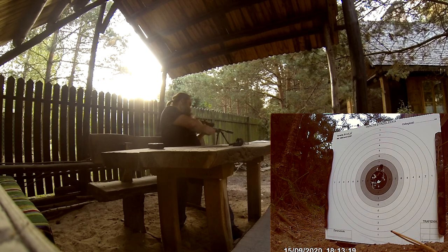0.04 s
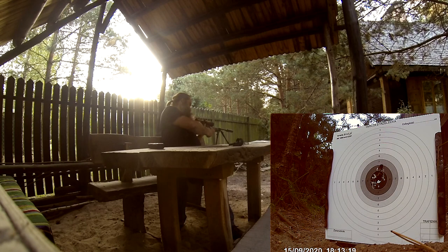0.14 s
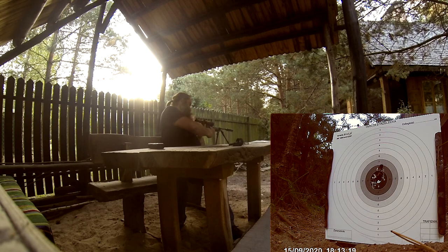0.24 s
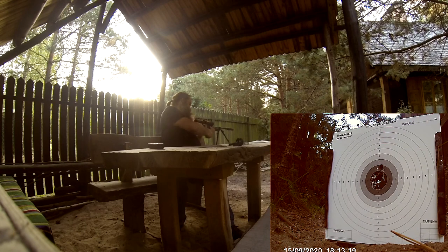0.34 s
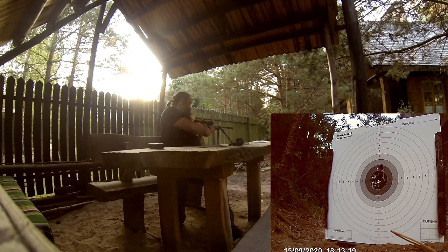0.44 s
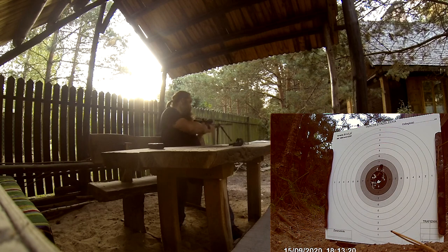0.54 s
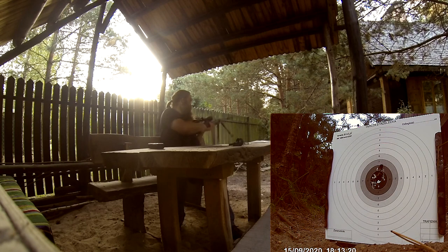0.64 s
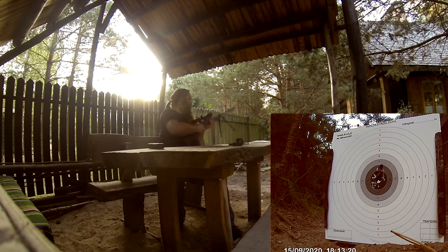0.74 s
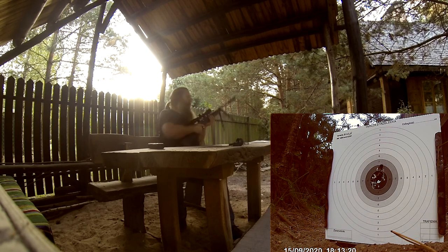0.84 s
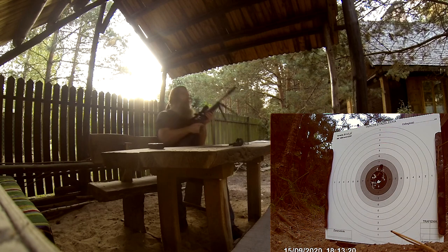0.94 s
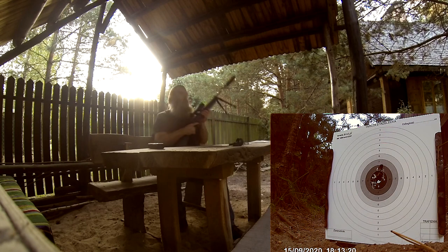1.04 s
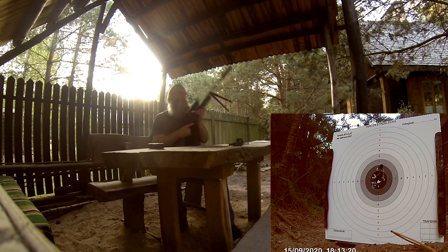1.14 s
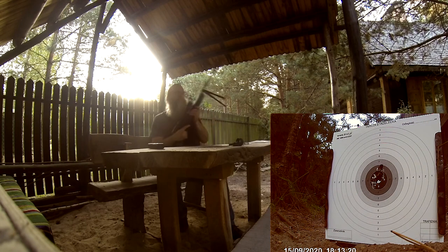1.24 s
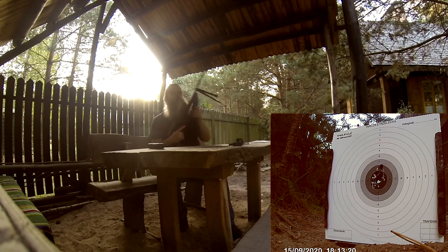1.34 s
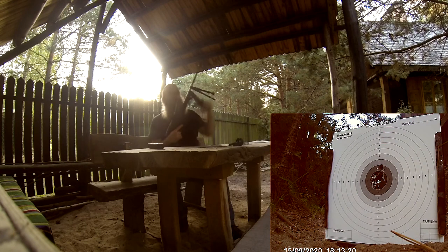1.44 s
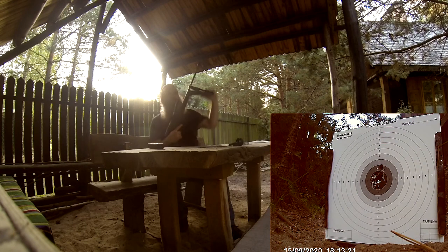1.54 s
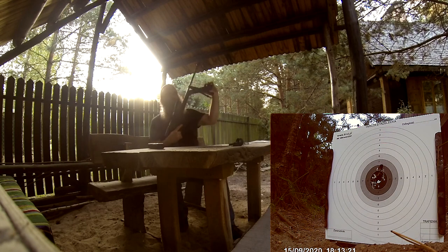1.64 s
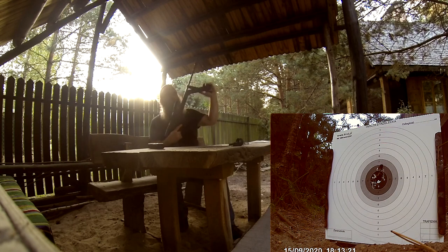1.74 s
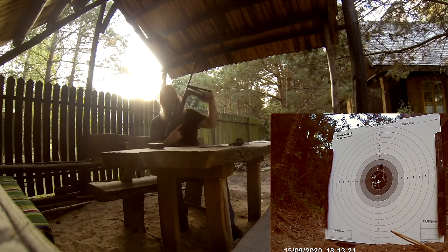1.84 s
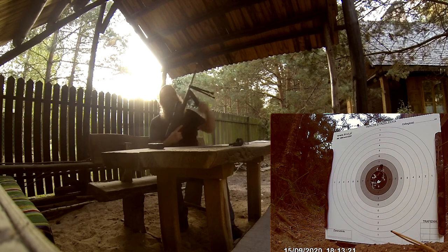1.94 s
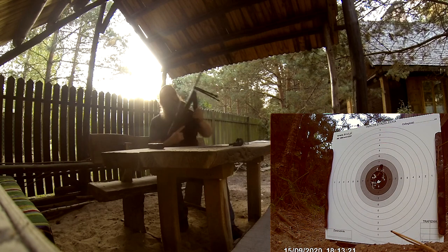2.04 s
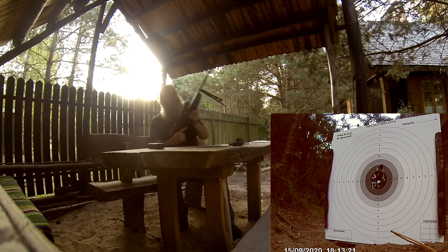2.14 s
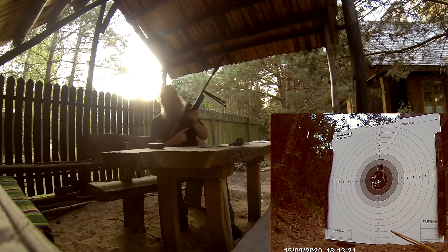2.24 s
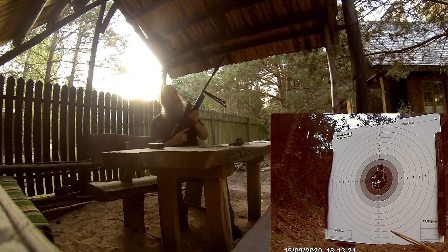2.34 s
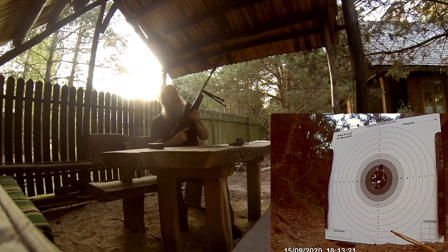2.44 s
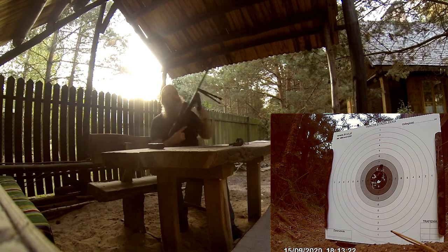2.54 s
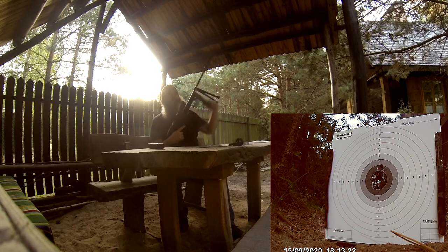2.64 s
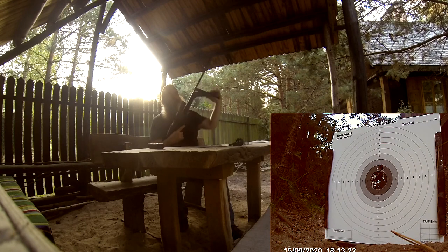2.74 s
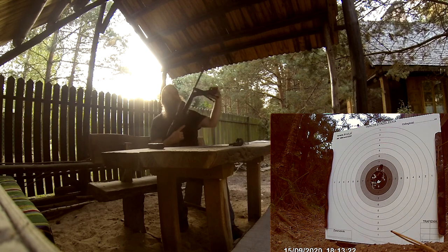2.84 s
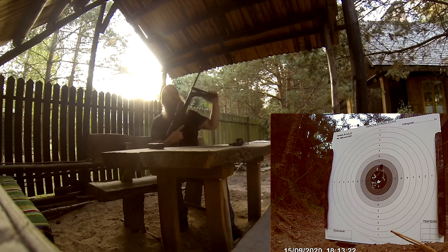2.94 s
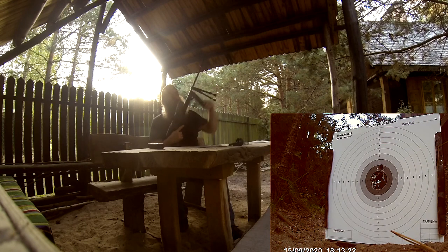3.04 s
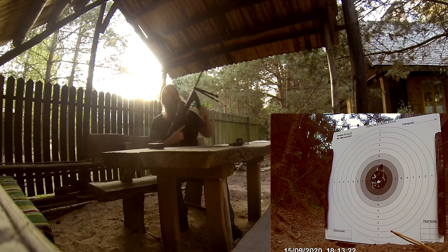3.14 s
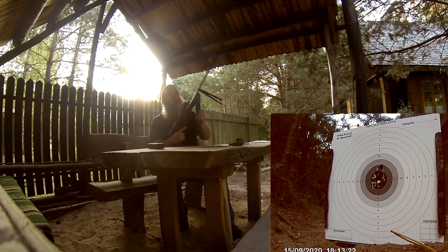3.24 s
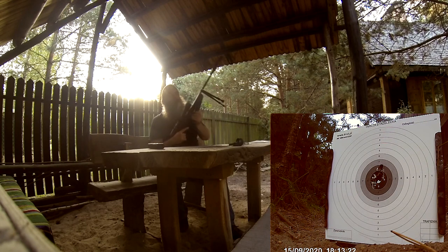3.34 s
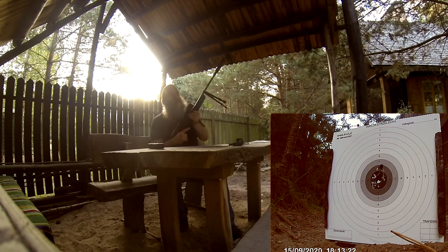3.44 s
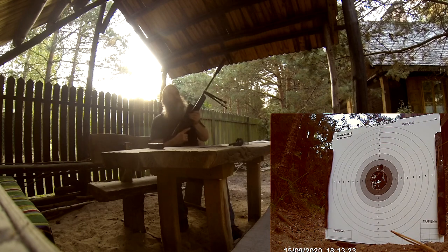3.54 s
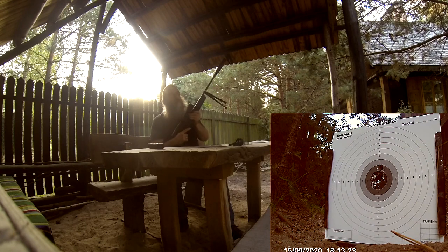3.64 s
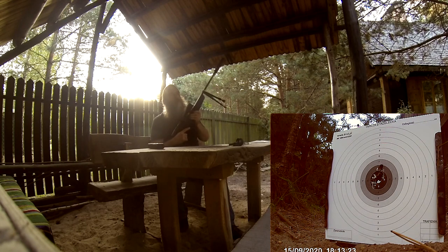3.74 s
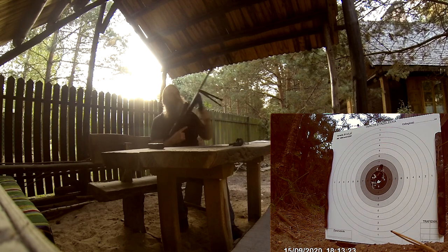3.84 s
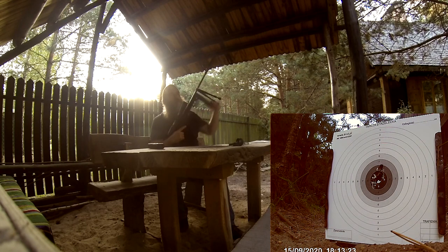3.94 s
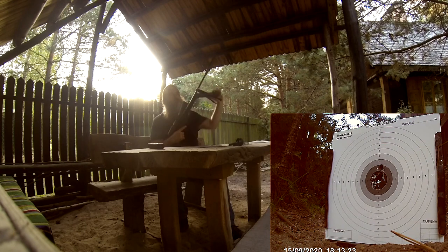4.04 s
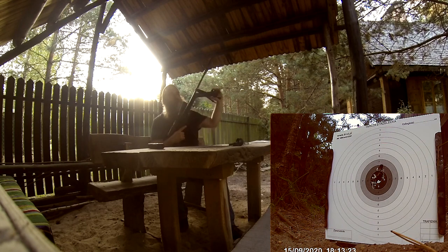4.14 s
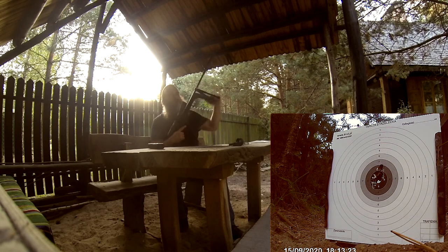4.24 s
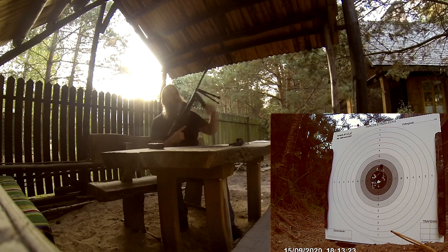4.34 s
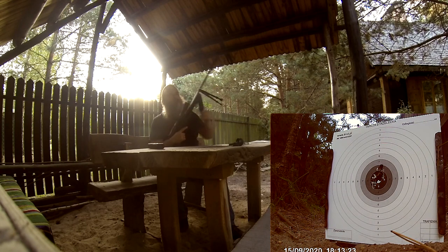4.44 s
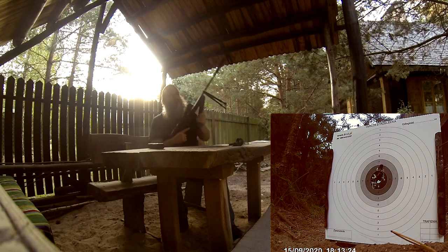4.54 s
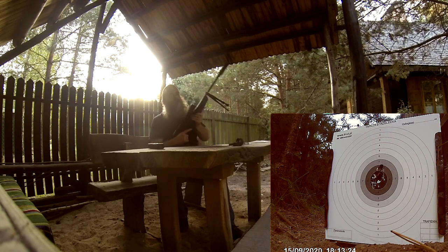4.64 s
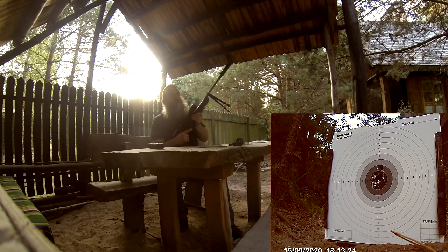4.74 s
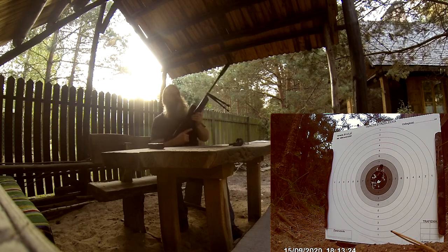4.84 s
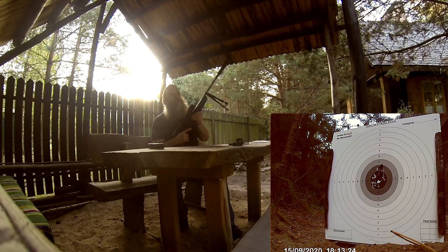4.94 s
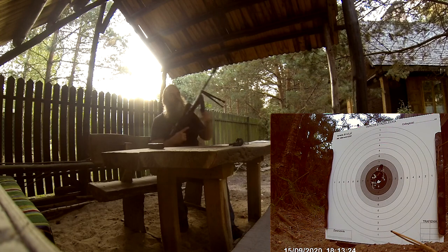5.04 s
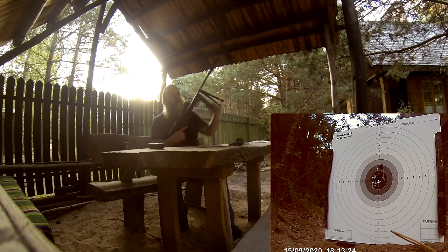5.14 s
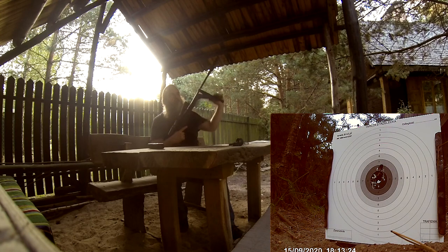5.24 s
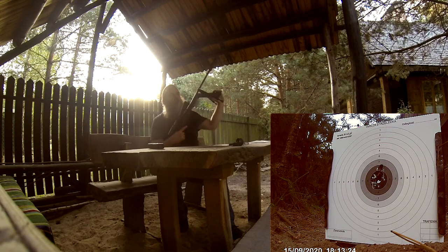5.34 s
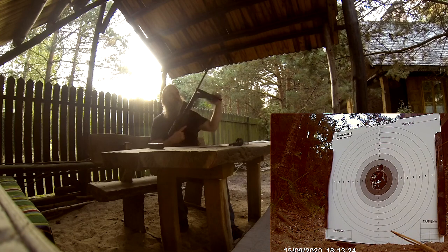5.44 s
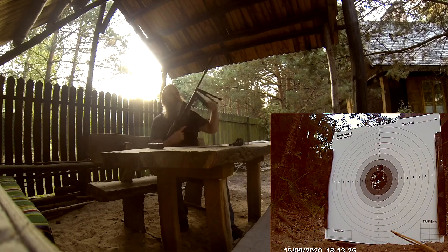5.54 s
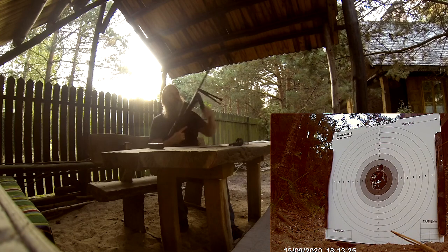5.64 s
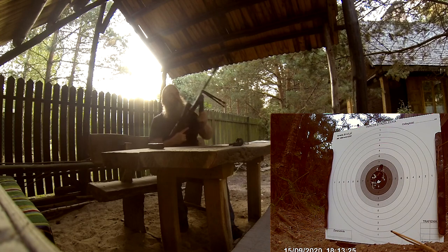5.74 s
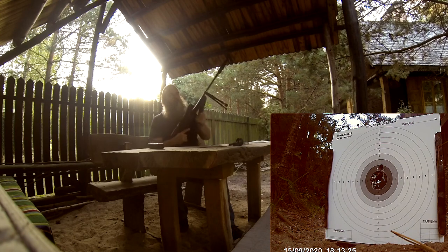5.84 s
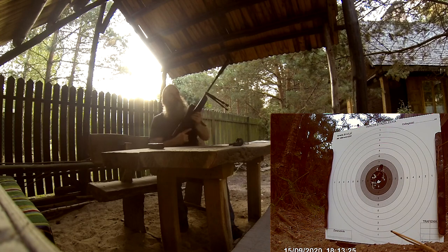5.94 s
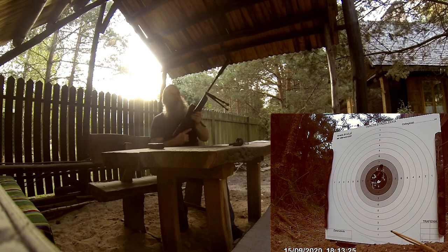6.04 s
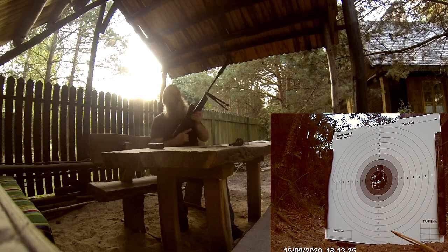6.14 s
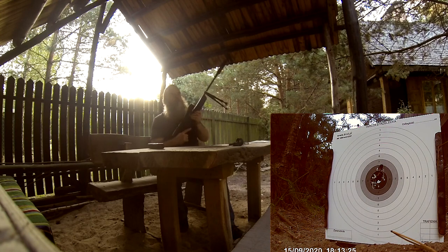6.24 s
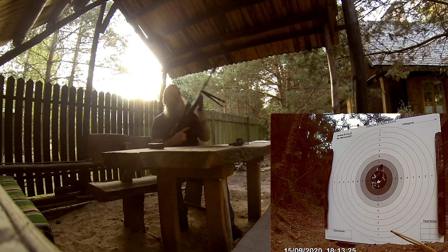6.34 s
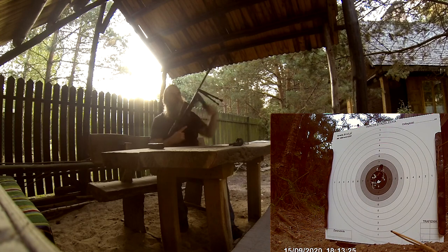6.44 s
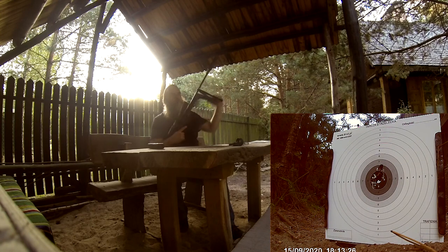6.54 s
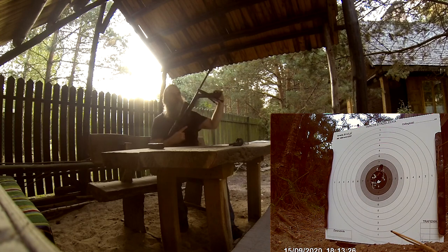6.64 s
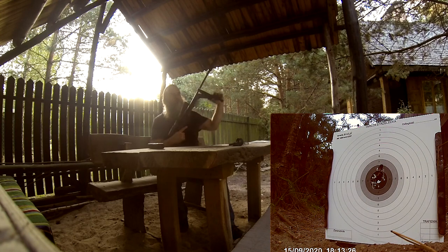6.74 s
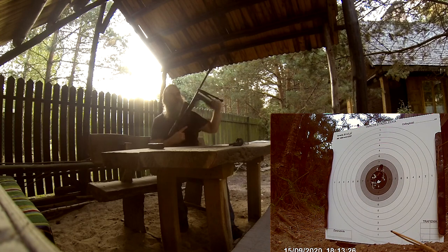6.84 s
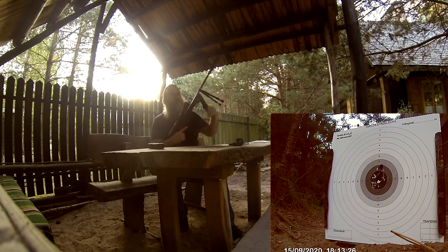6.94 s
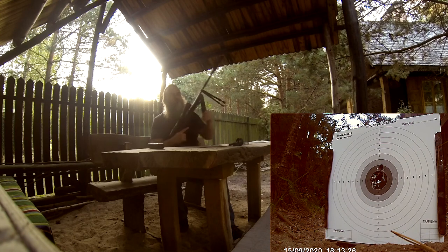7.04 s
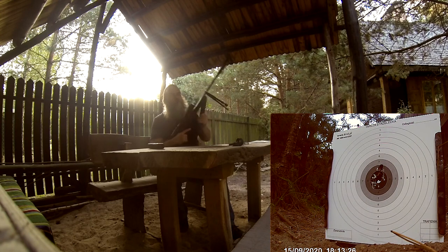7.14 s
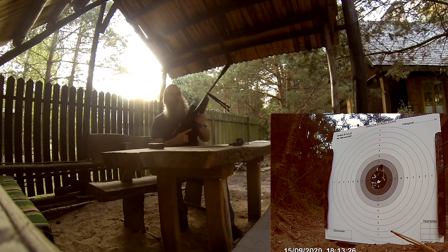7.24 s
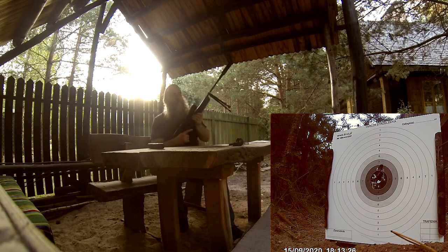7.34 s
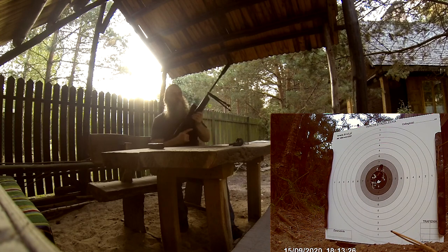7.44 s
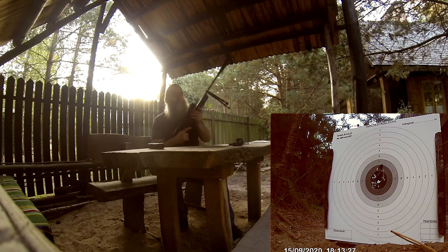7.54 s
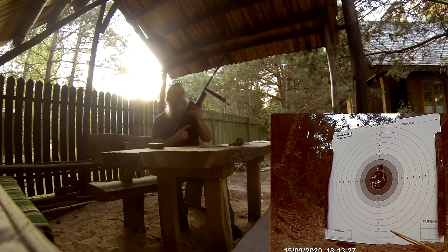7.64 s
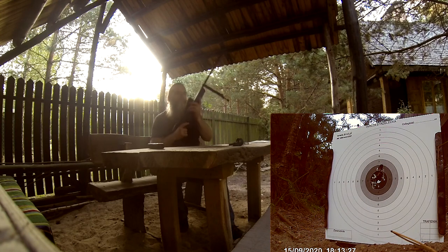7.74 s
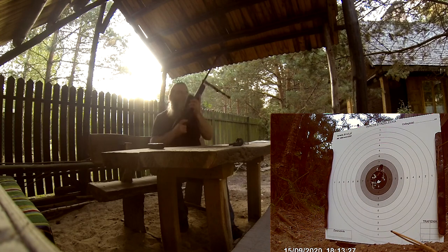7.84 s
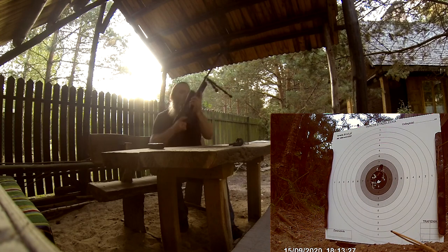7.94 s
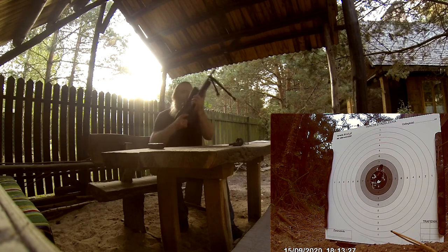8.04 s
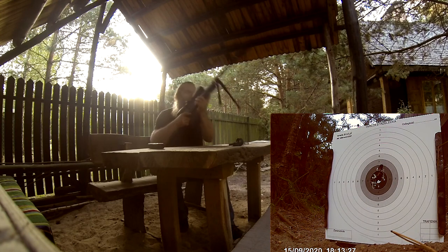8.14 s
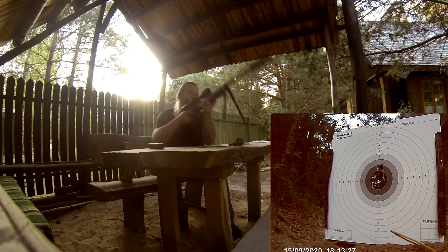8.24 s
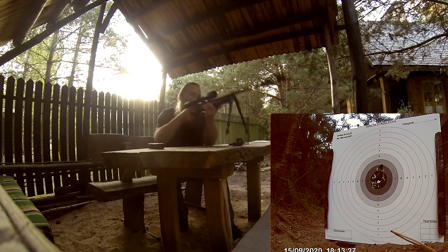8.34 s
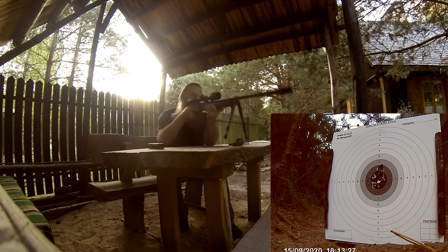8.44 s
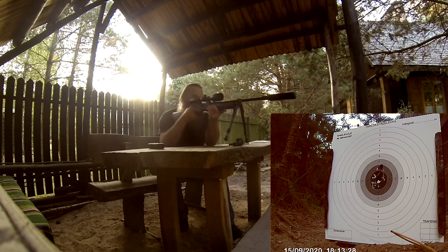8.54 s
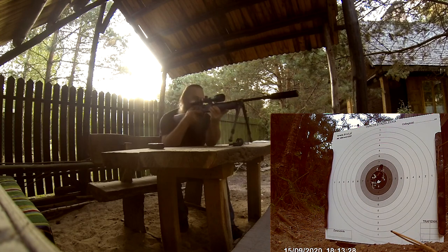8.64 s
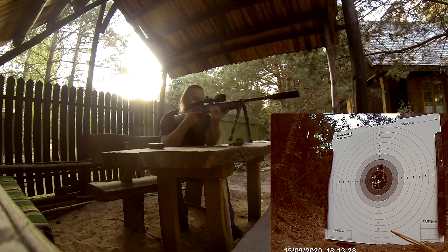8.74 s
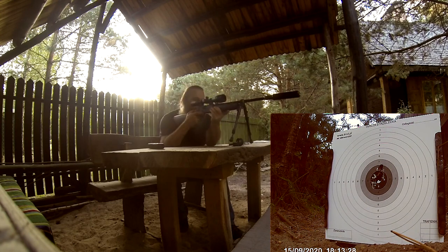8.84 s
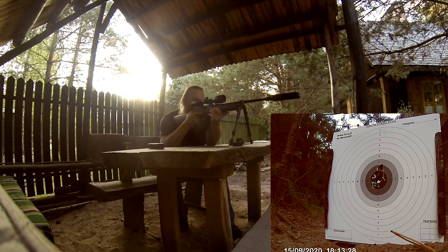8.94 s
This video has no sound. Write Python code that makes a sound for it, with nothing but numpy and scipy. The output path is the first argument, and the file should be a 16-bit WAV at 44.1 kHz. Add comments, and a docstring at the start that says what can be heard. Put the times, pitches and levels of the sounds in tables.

```python
"""First a far engine hum and a soft outdoor wash are heard, then the bolt of an air rifle clicking.
The rifle is pumped five times under a wooden roof: ticks of the linkage, then a snap of the forearm.
Blows ring its damped modes, noise bursts make the metal crack, and roof and fence return echoes.
Two engines beat as sines of wandering pitch; the wash is shaped noise, and faint tones are narrow noise.
The camera adds a whine pulsing once a frame."""
import sys
import numpy as np
from scipy import signal
from scipy.fft import rfft, irfft
from scipy.io import wavfile
from scipy.ndimage import uniform_filter1d

SR = 44100
rng = np.random.default_rng(int(sys.argv[2]) if len(sys.argv) > 2 else 0)


def digitize_waveform(pressure):
    """Quantize a signal to 16-bit integers and store it at the path in sys.argv[1].

    Rows of a 2-D input are taken as channels; values are limited to [-1, 1].
    """
    field = np.atleast_2d(pressure).T
    bounded = np.clip(field, -1, 1)
    quanta = np.round(bounded * 32767).astype(np.int16)
    wavfile.write(sys.argv[1], SR, quanta)


N = 396900  # length [samples]

# Rifle levels are those of each part before the low cut and the shelter.
# The forearm slams shut: (time [s], ring peak [dB], crack peak [dB])
FOREARM_SNAPS = [(2.208, -15.5, -23), (3.4435, -15, -21), (4.6844, -13, -19.5), (5.977, -14, -17.5),
                 (7.3320, -10.5, -18.5)]
# The latch touches just before each snap and twangs: (time [s], crack peak [dB], ring peak [dB])
LATCH_TOUCHES = [(2.178, -43.5, -37), (3.411, -43, -33), (4.6625, -41, -31.5), (5.951, -43, -37),
                 (7.3094, -39.5, -33)]
# One last touch as the forearm seats: (time [s], crack peak [dB])
SEATING = 7.3265, -27
# The bolt is worked: (time [s], crack peak [dB], ring peak [dB])
BOLT_CLICKS = [(0.324, -46, -54), (.331, -30, -48), (.341, -23.5, -42), (0.348, -48, -52)]
# The forearm is unlatched and swung:
# (time [s], crack peak [dB], ring peak [dB], crack tilt [dB per octave])
LINKAGE_TICKS = [(1.286, -52, -45.5, 0), (1.32, -47.5, -51, -5.5), (1.3488, -46.5, -53, -1),
                 (1.3575, -56, -55, 0), (2.156, -55, -45, -3), (2.4453, -48.5, -40.5, 4),
                 (2.4885, -50, -48, -7), (3.7359, -48.5, -46, -0.5), (3.7893, -48.5, -50, -9),
                 (3.8285, -60, -53, -4), (4.9444, -57, -48, -1), (5.0017, -51.5, -50, -6),
                 (5.042, -57, -48, -4), (6.327, -46, -43.5, -6)]
# The link takes up its slack: a touch, a hit and a dull knock:
# (hit time [s], touch crack peak [dB], hit crack peak [dB], hit ring peak [dB],
#  centre of the hit's ring [Hz], knock peak [dB])
LINK_CLATTERS = [(2.5476, -42.5, -36.5, -39, 1070, -39), (3.8495, -43, -40.5, -35, 1350, -41),
                 (5.0654, -46.5, -51, -39.5, 1100, -54), (6.4004, -46, -38.5, -38, 2600, -41)]
# The forearm meets its open stop, at times with a faint rebound:
# (time [s], crack peak [dB], ring peak [dB])
OPEN_STOPS = [(1.621, -40.5, -51), (2.7894, -43, -48), (2.8968, -57, -55), (4.0717, -42, -45),
              (4.1812, -49.5, -59), (5.3053, -43, -53), (6.6374, -42.5, -47)]
# Modes of stock, tube and forearm, before extra damping:
# (frequency [Hz], relative level in a snap [dB], decay time t60 [s])
RIFLE_MODES = [(372, -13, 0.047), (544, -9, 0.041), (614, -9.5, 0.065), (697, -1, .046), (867, -8.5, 0.051),
               (958, -16.5, 0.032), (1067, -9, 0.039), (1176, 0, 0.025), (1288, -7.5, 0.056),
               (1456, -7.5, 0.02), (1598, -10.5, 0.051), (1733, -10.5, 0.019), (1904, -17, .04),
               (2145, -13.5, 0.025), (2458, -17, 0.073), (2710, -28, 0.033), (3370, -11.5, 0.029),
               (3780, -13.5, 0.013), (4070, -17.5, 0.045), (4765, -7, 0.0079)]
# Colour of chattering metal before tilt: (frequency [Hz], relative level [dB])
CRACK_COLOUR = [(250, -50), (600, -5), (1500, 0), (3300, 5.5), (5000, -2), (7000, -3), (10000, -10),
                (13000, -10.5), (16000, -29.5)]
# Reflections from table, roof, fence and trees: (time [s], level [dB])
EARLY_ECHOES = [(0.0051, -7.5), (0.008, -10), (0.0113, -12), (0.0138, -13.5), (0.0199, -16), (0.038, -25.5),
                (0.073, -30.5)]
# Decay of the shelter's late tail: (frequency [Hz], decay time t60 [s])
SHELTER_DECAY = [(300, 0.083), (700, 0.31), (1500, 0.35), (4000, 0.27), (12000, 0.33)]
# Hunting idle: (time [s], firing rate [Hz], rms level of the fundamental [dB])
IDLE_COURSE = [(0.0, 51.46, -50.2), (0.4, 50.35, -45.9), (1.1, 52.36, -47.7), (1.6, 52.77, -51.6),
               (2.1, 52.64, -54.9), (2.8, 50.58, -46.9), (3.3, 52.02, -48.3), (3.8, 54.16, -54.6),
               (4.5, 50.73, -45.2), (5.2, 53.02, -49.7), (6.0, 52.12, -47.6), (6.6, 52.12, -46.8),
               (7.1, 50.18, -45.6), (7.8, 52.25, -49.3), (8.3, 50.8, -46.2), (9.0, 52.79, -46.5)]
# Upper orders of the idling engine: (multiple of firing rate [1], level re fundamental [dB])
IDLE_ORDERS = [(2, -16.5), (3, -20)]
# The other engine revs up and down: (time [s], firing rate [Hz])
REV_COURSE = [(0.0, 59.32), (0.33, 61.5), (0.82, 56.46), (1.43, 61.61), (1.91, 55.6), (2.64, 47.79),
              (3.24, 53.9), (3.71, 61.63), (4.07, 53.79), (4.51, 49.08), (4.58, 50.87), (5.31, 46.44),
              (6.17, 39.69), (6.77, 53.3), (7.37, 58.74), (7.83, 61.87), (8.27, 58.02), (8.78, 50.6),
              (9.0, 53.86)]
# The revving engine booms near its pipe resonance: (firing rate [Hz], rms level [dB])
EXHAUST_BOOM = [(40.0, -65), (46.0, -56), (50.0, -47), (54.0, -47), (57.0, -45), (60.0, -51.5), (62.0, -55)]
# Wavering far tones: (frequency [Hz], bandwidth [Hz], rms level [dB])
FAR_TONES = [(80.7, 4, -71), (120.4, 6.5, -66), (182.5, 4.5, -69)]
# Spectrum of the wash before its overall level is set: (frequency [Hz], relative density [dB per Hz])
WASH_SPECTRUM = [(15, 4.5), (40, 3), (70, -9.5), (90, -6), (180, -6.5), (260, -10), (350, -12.5),
                 (550, -16), (700, -12.5), (1000, -15.5), (1500, -18), (2500, -23), (6000, -34),
                 (15000, -43)]

# Frequencies in Hz, tilts in dB per octave, decay times t60 in s
TICK_HZ, TICK_T60 = 1200, 0.046
BOLT_HZ, BOLT_TILT_DB, BOLT_T60 = 2990, -1, 0.016
STOP_HZ, STOP_TILT_DB, STOP_T60 = 1350, 3, 0.016
CLATTER_TILT_DB, CLATTER_T60 = 2.5, 0.0092
TOUCH_LEAD_S, TOUCH_TILT_DB = 0.0055, 5
TOUCH_RING_DB = -2.5  # ring peak relative to the touch's crack
KNOCK_DELAY_S, KNOCK_HZ = 0.0078, 1060
SQUEAK_S, SQUEAK_LENGTH_S, SQUEAK_EDGE_S = 1.32, 0.058, 0.008
SQUEAK_DB = -56.5  # rms between the edges
SQUEAK_FROM_HZ, SQUEAK_TO_HZ, SQUEAK_GLIDE_S, SQUEAK_WIDTH_HZ = 1130, 1350, 0.0357, 53
FAN_MULTIPLE, FAN_WIDTH_HZ = 29.8, 6  # multiple of the idling firing rate
FAN_DB, FAN_FADE_DB_PER_S = -23.5, 1  # starting level relative to the idling fundamental
WASH_DB, SWELL_DB, PATCHY_DB = -55.5, 0.46, 1.2  # rms level, then rms depths of the drifts
FRAMES_PER_S = 60 / 1.001
WHINE_HZ, WHINE_ON, WHINE_OFF = 11420, 0.14, 0.68  # on and off as shares of a frame
WHINE_DB, WHINE_WANDER_DB = -80, 4  # middle peak level and its spread from frame to frame
EDGE_HZ, OFFSET = 14950, 0.0104  # band limit, steady offset of full scale


def rifle():
    """Radiation efficiency: so small a body radiates little bass, hence a low cut on all its sounds."""
    out = snaps() + latch() + bolt() + ticks() + clatters() + stops()
    add(out, SQUEAK_S, squeak())
    low_cut = signal.butter(4, 320, "high", fs=SR, output="sos")
    return signal.sosfilt(low_cut, out)


def snaps():
    """Impulsive excitation: one clean blow rings all modes while the metal cracks."""
    out = np.zeros(N)
    for s, ring_db, crack_db in FOREARM_SNAPS:
        add(out, s, gain_of(ring_db) * peaked(ring(spread_db=1)))
        add(out, s, gain_of(crack_db) * crack(-0.6, 0.022, rise=0.0002))
    seat_s, seat_db = SEATING
    add(out, seat_s, gain_of(seat_db) * crack(-3.3, 0.019))
    return out


def latch():
    """Selective excitation: a light touch cracks, then twangs the modes close to its own pitch."""
    out = np.zeros(N)
    for s, crack_db, ring_db in LATCH_TOUCHES:
        add(out, s, gain_of(crack_db) * crack(0.36, 0.068))
        twang = rattled(ring(1, centre_hz=1190, narrow_db=104, damping_db=1100))
        add(out, s + 0.00193, gain_of(ring_db) * twang)
    return out


def bolt():
    """Impact of small metal parts: brief contacts favour the higher modes."""
    out = np.zeros(N)
    for s, crack_db, ring_db in BOLT_CLICKS:
        add(out, s, tick(crack_db, ring_db, BOLT_HZ, BOLT_TILT_DB, BOLT_T60))
    return out


def ticks():
    """Light impact: each contact in the linkage has its own balance of chatter and ring."""
    out = np.zeros(N)
    for s, crack_db, ring_db, tilt_db in LINKAGE_TICKS:
        add(out, s, tick(crack_db, ring_db, TICK_HZ, tilt_db, TICK_T60))
    return out


def clatters():
    """Mechanical play: as slack is taken up, a touch, a hit and a dull knock follow closely."""
    out = np.zeros(N)
    for s, touch_db, crack_db, ring_db, hz, knock_db in LINK_CLATTERS:
        touch = tick(touch_db, touch_db + TOUCH_RING_DB, TICK_HZ, TOUCH_TILT_DB, TICK_T60)
        add(out, s - TOUCH_LEAD_S, touch)
        add(out, s, tick(crack_db, ring_db, hz, CLATTER_TILT_DB, CLATTER_T60))
        add(out, s + KNOCK_DELAY_S, gain_of(knock_db) * knock(KNOCK_HZ))
    return out


def stops():
    """Impact against a stop: a short chatter and a damped knock."""
    out = np.zeros(N)
    for s, crack_db, ring_db in OPEN_STOPS:
        add(out, s, tick(crack_db, ring_db, STOP_HZ, STOP_TILT_DB, STOP_T60))
    return out


def squeak():
    """Dry friction: the slipping hinge gives a short, slightly rough rising tone."""
    t = np.arange(0, SQUEAK_LENGTH_S, 1 / SR)
    glide = np.minimum(t / SQUEAK_GLIDE_S, 1)
    hz = SQUEAK_FROM_HZ + (SQUEAK_TO_HZ - SQUEAK_FROM_HZ) * glide
    edges = np.clip(np.minimum(t, SQUEAK_LENGTH_S - t) / SQUEAK_EDGE_S, 0, 1)
    return gain_of(SQUEAK_DB) * edges * narrow_noise(hz, SQUEAK_WIDTH_HZ, size=len(t))


def tick(crack_db, ring_db, hz, tilt_db, t60):
    """Superposition: a knock of the body plus its chatter of metal."""
    sound = gain_of(crack_db) * crack(tilt_db, t60, rise=0.0009)
    add(sound, 0, gain_of(ring_db) * knock(hz))
    return sound


def knock(hz):
    """Added damping: the hands shorten the ring of a small blow."""
    return rattled(ring(2.1, centre_hz=hz, narrow_db=18, damping_db=2600))


def rattled(sound):
    """Repeated impact: a loose part lands in a short, dying flurry of touches."""
    t = np.arange(256) / SR
    touches = rng.standard_normal(256) * gain_of(-60 * t / 0.01)
    return peaked(signal.fftconvolve(touches, sound))


def ring(spread_db, centre_hz=1000, narrow_db=0, damping_db=0):
    """Modal superposition: decaying sines of alternating sign; damping_db adds decay [dB per s]."""
    hz, mode_db, t60 = np.transpose(RIFLE_MODES)[:, :, None]
    t = np.arange(SR // 8) / SR
    # a small blow ignores the snap's levels and wakes modes by distance in octaves
    if narrow_db:
        mode_db = -narrow_db * np.log2(hz / centre_hz) ** 2
    mode_db = mode_db + spread_db * rng.standard_normal(hz.shape)
    sign = (-1.) ** np.arange(len(hz))[:, None]
    decay = gain_of(mode_db - (60 / t60 + damping_db) * t)
    return (sign * decay * np.sin(2 * np.pi * hz * t)).sum(0)


def crack(tilt_db, t60, rise=0.00043):
    """Broadband contact noise: coloured chatter dies fast, over a softer and slower settling."""
    hz, t = np.fft.rfftfreq(8192, 1 / SR), np.arange(8192) / SR
    # the tilt turns about 4 kHz and levels off in the bass
    colour = gain_of(read(CRACK_COLOUR, hz) + tilt_db * np.log2(hz / 4000 + 0.058))
    noise = irfft(rfft(rng.standard_normal(8192)) * colour)
    dying = gain_of(-60 * t / t60) + gain_of(-19 - 60 * t / 0.1)
    return peaked(noise * dying * (1 - np.exp(-t / rise)))


def shelter(x):
    """Reflection and reverberation: early echoes, then sparse taps whose bands decay at their own rates."""
    taps = np.zeros(SR // 2)
    at = np.arange(800, len(taps) - 20, 20)
    taps[at + rng.integers(0, 20, len(at))] = rng.choice([-1., 1.], len(at))
    hz, t, z = signal.stft(taps, SR, nperseg=256)
    decay = gain_of(-60 * t / read(SHELTER_DECAY, hz)[:, None])
    response = signal.istft(z * decay, SR, nperseg=256)[1]
    response = gain_of(-16.5) * response / np.linalg.norm(response)
    for s, db in [(0.0008, 0.01)] + EARLY_ECHOES:  # the direct path comes first
        add(response, s, gain_of([db]))
    return signal.fftconvolve(x, response)[:N]


def engines():
    """Beating: one engine hunts at idle, its fan singing along; the other revs up and down through it."""
    t = np.arange(N) / SR
    s, hz, db = np.transpose(IDLE_COURSE)
    idle_hz, idle_db = np.interp(t, s, hz), np.interp(t, s, db)
    fan_level = gain_of(idle_db + FAN_DB - FAN_FADE_DB_PER_S * t)
    fan = fan_level * narrow_noise(FAN_MULTIPLE * idle_hz, FAN_WIDTH_HZ)
    rev_hz = np.interp(t, *np.transpose(REV_COURSE))
    rev_db = np.interp(rev_hz, *np.transpose(EXHAUST_BOOM))
    return engine(idle_hz, idle_db, IDLE_ORDERS) + fan + engine(rev_hz, rev_db, [])


def engine(hz, db, orders):
    """Harmonic series: a drone on the firing rate, with any weak upper orders given."""
    turn = 2 * np.pi * np.cumsum(hz) / SR
    upper = sum(gain_of(order_db) * np.sin(k * turn) for k, order_db in orders)
    return np.sqrt(2) * gain_of(db) * (np.sin(turn) + upper)


def faint_tones():
    """Narrow-band noise: far tones whose level and phase waver at a rate set by their bandwidth."""
    return sum(gain_of(db) * narrow_noise(hz, width) for hz, width, db in FAR_TONES)


def wash():
    """Incoherent sum of far traffic and leaves: random short-time spectra with drifting patches."""
    frames, hz = N // 256 + 5, np.fft.rfftfreq(1024, 1 / SR)
    real, imaginary, patches = rng.standard_normal((frames, 513, 3)).T
    # smooth over frequency, then over time
    patches = evened(uniform_filter1d(uniform_filter1d(patches, 12, 0), 14, 1))
    swell = evened(uniform_filter1d(rng.standard_normal(frames), 80))
    level_db = read(WASH_SPECTRUM, hz)[:, None] + PATCHY_DB * patches + SWELL_DB * swell
    z = (real + 1j * imaginary) * gain_of(level_db)
    noise = evened(signal.istft(z, nperseg=1024, noverlap=768)[1][:N])
    return noise * gain_of(WASH_DB)


def narrow_noise(hz, width, size=N):
    """Modulation: noise smoothed to a slow wobble, carried on a frequency or a pitch curve."""
    r = np.exp(-np.pi * width / SR)
    white = rng.standard_normal((2, size + SR // 10))
    slow = signal.lfilter([1], [1, -r], white)[:, -size:]  # drop the filter's start
    carrier = np.exp(2j * np.pi * np.cumsum(hz * np.ones(size)) / SR)
    return evened(((slow[0] + 1j * slow[1]) * carrier).real)


def gain_of(db):
    """Decibel law: level to amplitude ratio."""
    return 10 ** (np.asarray(db) / 20)


def evened(x):
    """Normalisation to unit rms."""
    return x / np.sqrt(np.mean(x ** 2) + 1e-20)


def peaked(x):
    """Normalisation to unit peak."""
    return x / abs(x).max()


def read(points, hz):
    """Interpolation of a table along log frequency."""
    f, value = np.transpose(points)
    return np.interp(np.log(hz + 1), np.log(f + 1), value)


def add(mix, s, sound):
    """Superposition: add a sound into the mix in place, from time s [s]."""
    part = mix[round(s * SR):][:len(sound)]
    part += sound[:len(part)]


def scene():
    """Superposition: the sheltered rifle over the open-air background, as one channel."""
    return (shelter(rifle()) + engines() + faint_tones() + wash())[None]


def record(dry):
    """Electrical leakage and band limiting: a whine burst once a frame, a low-pass, a steady offset."""
    frame, phase = np.divmod(np.arange(N) / SR * FRAMES_PER_S, 1)
    burst = np.sin(np.pi * np.clip((phase - WHINE_ON) / (WHINE_OFF - WHINE_ON), 0, 1))
    frame_db = WHINE_DB + WHINE_WANDER_DB * rng.standard_normal(int(frame[-1]) + 1)
    level = gain_of(frame_db)[frame.astype(int)]
    # the sine restarts with every frame
    whine = level * burst * np.sin(2 * np.pi * WHINE_HZ * phase / FRAMES_PER_S)
    edge = signal.firwin(511, EDGE_HZ, window=("kaiser", 9), fs=SR)
    return signal.oaconvolve(dry + whine, edge[None], "same") + OFFSET


dry = scene()
out = record(dry)
digitize_waveform(out)
```